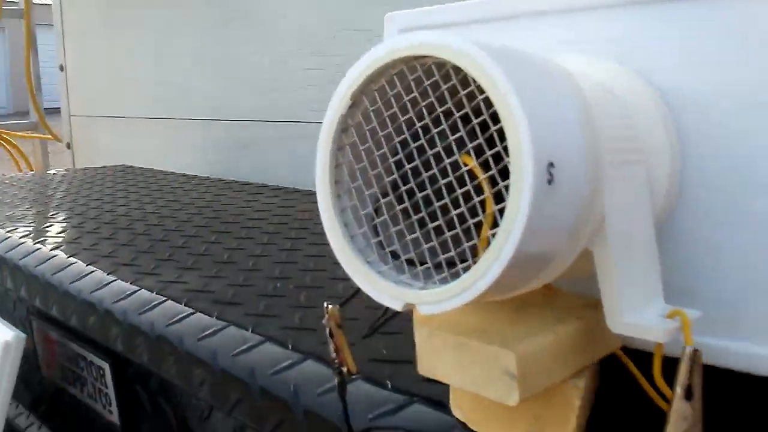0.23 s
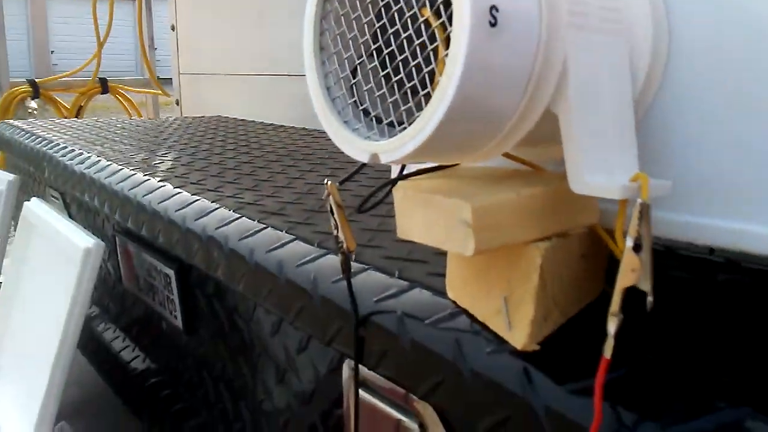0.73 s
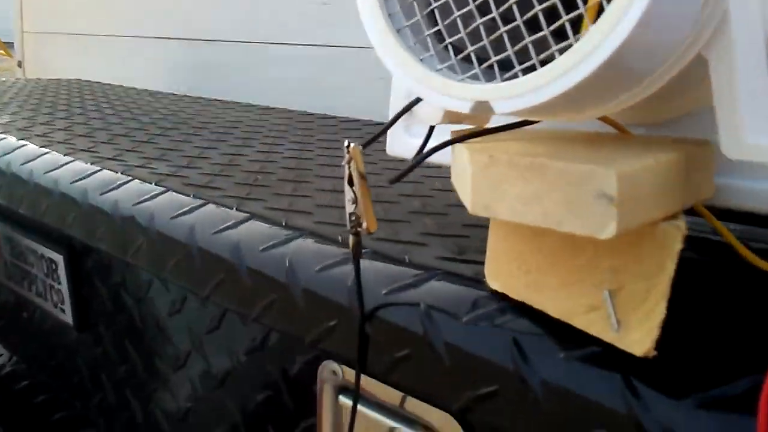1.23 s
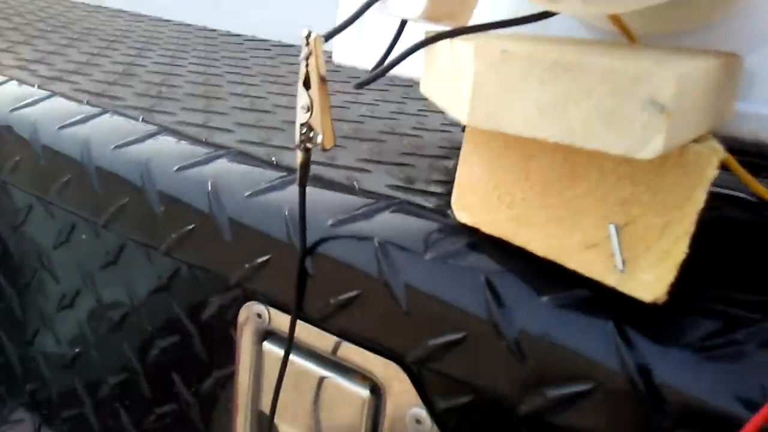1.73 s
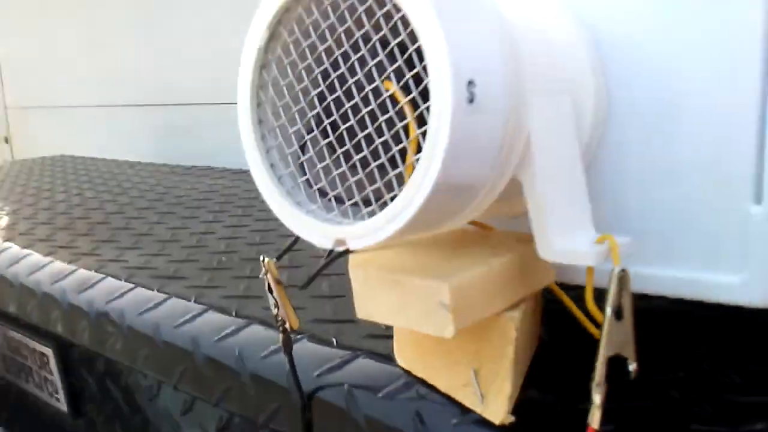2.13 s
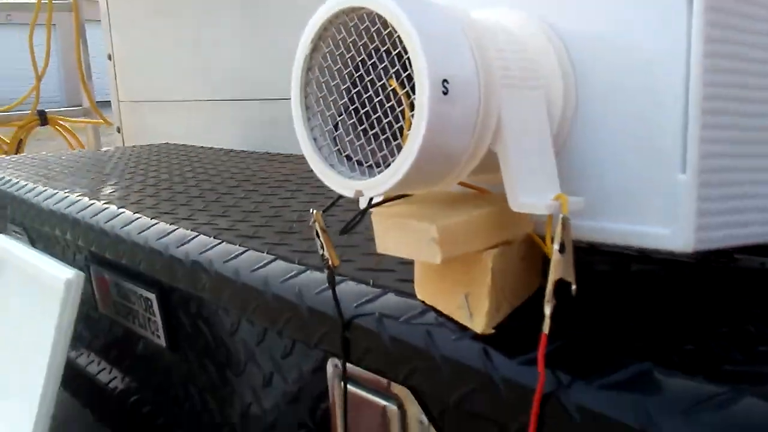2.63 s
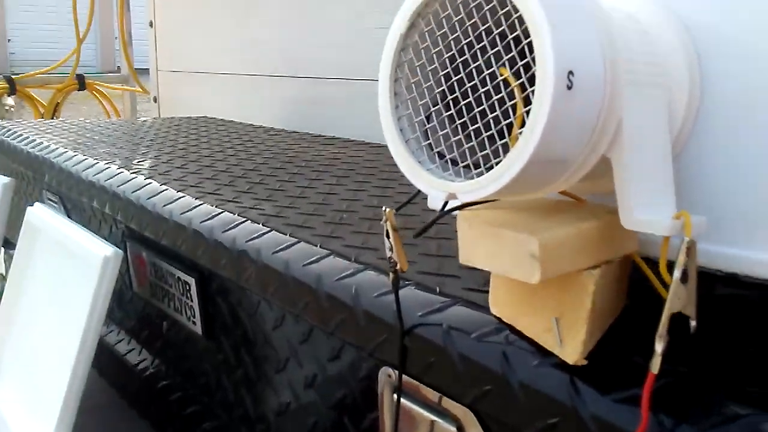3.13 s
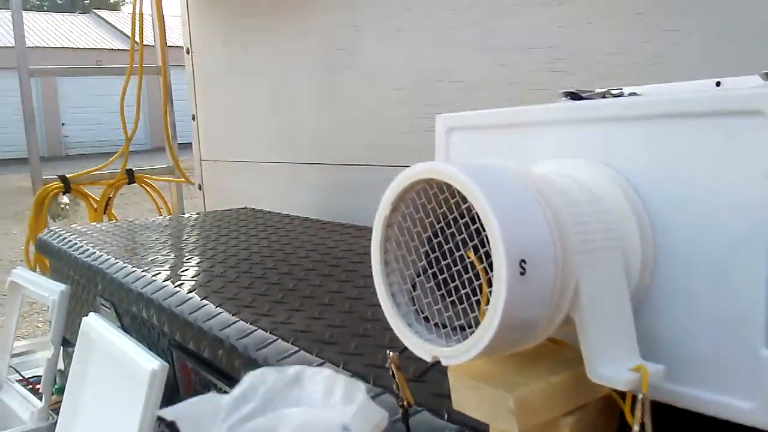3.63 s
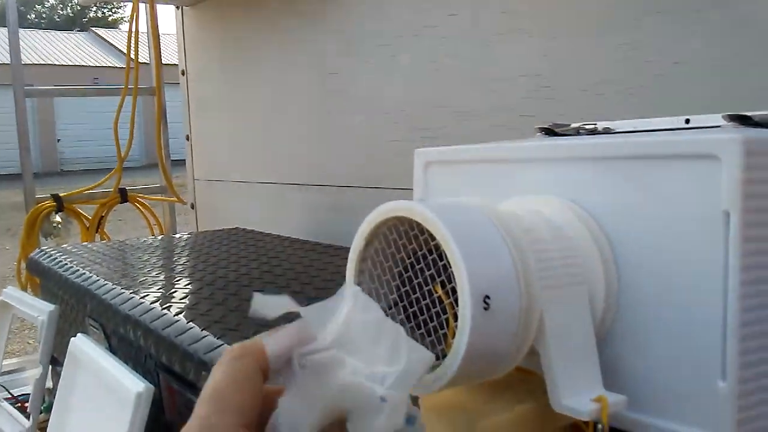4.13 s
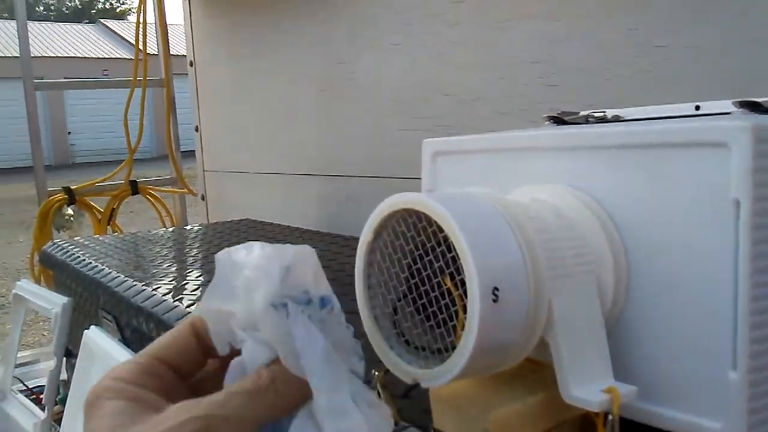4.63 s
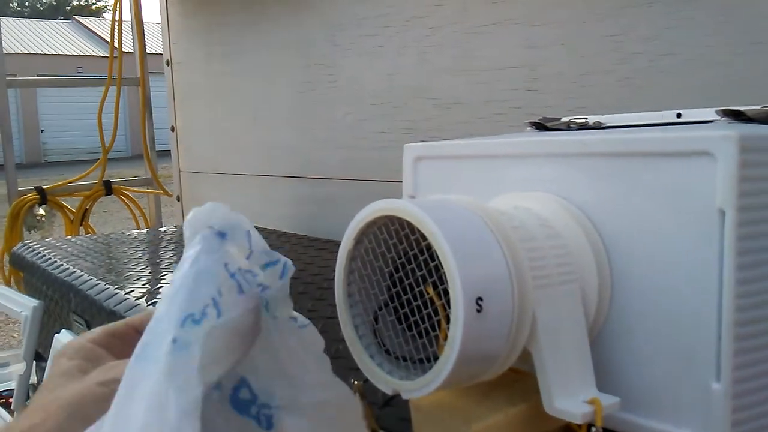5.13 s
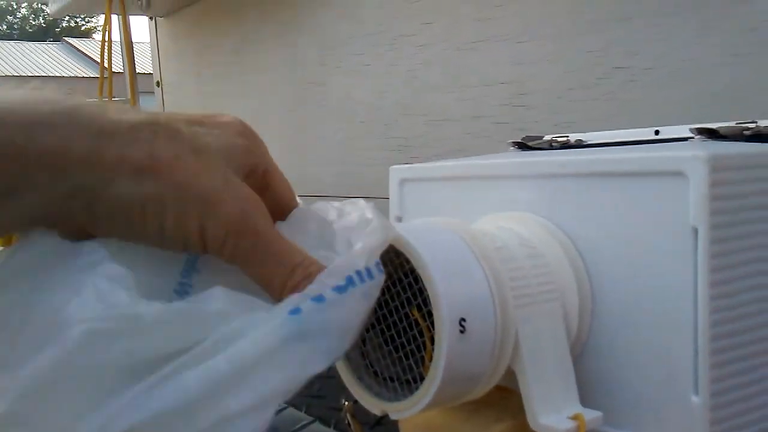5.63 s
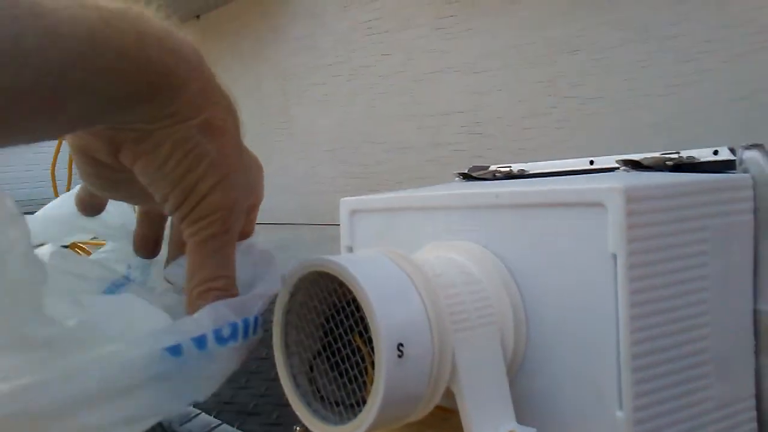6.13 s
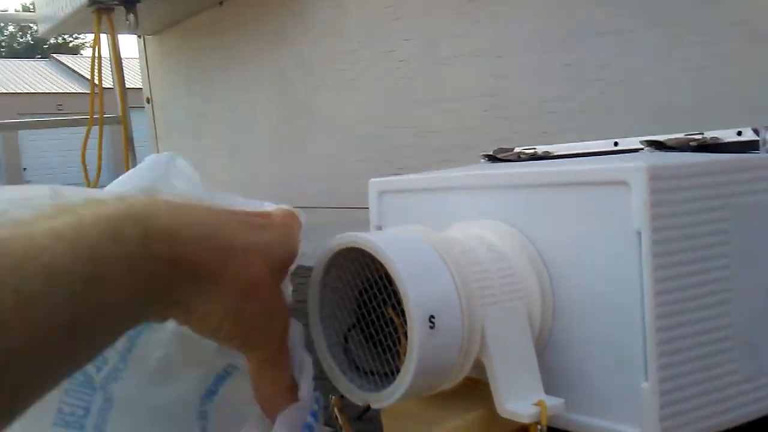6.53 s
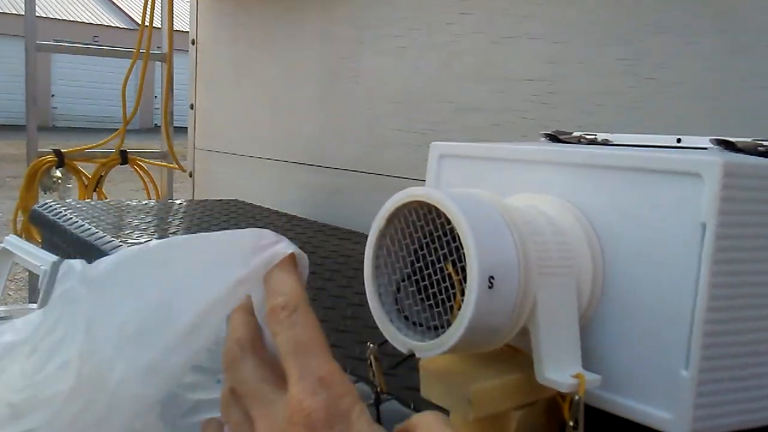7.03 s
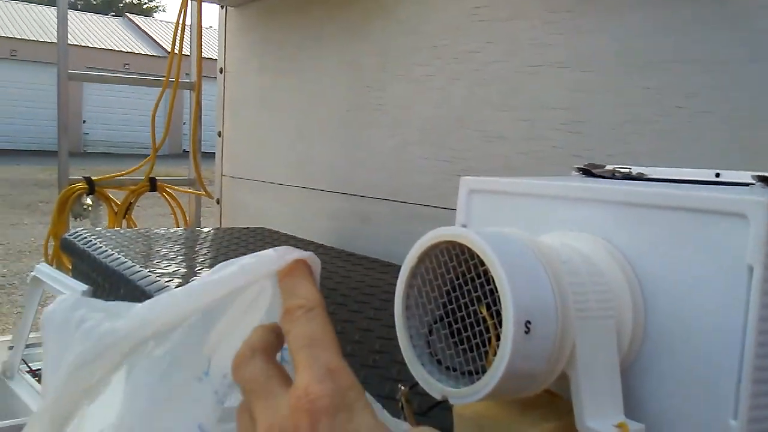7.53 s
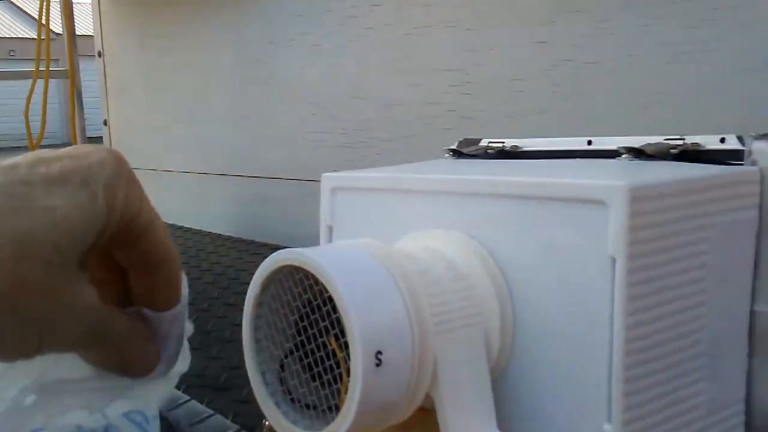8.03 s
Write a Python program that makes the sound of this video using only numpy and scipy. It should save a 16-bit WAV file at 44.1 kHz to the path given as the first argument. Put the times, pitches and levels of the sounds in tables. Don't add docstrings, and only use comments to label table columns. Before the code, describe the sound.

A small blower whines steadily around a high, piercing pitch with rushing ducted air while a thin plastic bag crackles in its stream outdoors.

```python
import sys
import numpy as np
from scipy import signal
from scipy.fft import rfft, irfft
from scipy.io import wavfile
from scipy.ndimage import uniform_filter1d

SR = 44100
rng = np.random.default_rng(int(sys.argv[2]) if len(sys.argv) > 2 else 0)


def transcribe(signal):
    frames = np.atleast_2d(signal).T
    limited = np.clip(frames, -1, 1)
    pcm = np.round(limited * 32767).astype(np.int16)
    wavfile.write(sys.argv[1], SR, pcm)


def gain_from_db(level_db):
    decades = np.asarray(level_db, float) / 20
    return 10 ** decades


N = 366030
TIME = np.arange(N) / SR
SLOW = TIME[::100]


def track(table):
    s, *columns = np.transpose(table)
    return [np.interp(TIME, s, c) for c in columns]


def shape(x, points, modes=()):
    hz = np.arange(1, N // 2 + 2) * SR / N
    point_hz, point_db = np.array(points).T
    gain = gain_from_db(np.interp(np.log(hz), np.log(point_hz), point_db))
    for centre_hz, width_hz, db in modes:
        gain = gain * np.sqrt(1 + gain_from_db(2 * db) / (1 + (2 * (hz - centre_hz) / width_hz) ** 2))
    return irfft(rfft(x) * gain, N)


def unit(x, lo_hz=20, hi_hz=20000):
    power = np.abs(rfft(x)[int(lo_hz * N / SR):int(hi_hz * N / SR)]) ** 2
    return x * N / np.sqrt(2 * power.sum())


def noise(points, modes=(), lo_hz=20, hi_hz=20000):
    return unit(shape(rng.standard_normal(N), points, modes), lo_hz, hi_hz)


def walk(rate_hz):
    k = int(SR / rate_hz)
    held = np.repeat(rng.standard_normal(N // k + 1), k)
    return 1.3 * uniform_filter1d(uniform_filter1d(held, k), k)[:N]


def tone(angle, db):
    return np.sqrt(2) * gain_from_db(db) * np.sin(angle + 2 * np.pi * rng.random())


def both(*dbs):
    return 10 * np.log10(sum(gain_from_db(db) ** 2 for db in dbs))


def bell(s, width_s, onset=1):
    side_s = np.where(SLOW < s, width_s * onset, width_s / onset)
    return np.exp(-((SLOW - s) / side_s) ** 2)


def swells(rows, rest_db, onset=1):
    power = gain_from_db(rest_db) ** 2 + sum(gain_from_db(db) ** 2 * bell(s, w, onset) for s, db, w in rows)
    return np.interp(TIME, SLOW, 10 * np.log10(power))


def dips(rows, which):
    depths = (depth * bell(s, w) for k, s, depth, w in rows if k == which)
    return np.interp(TIME, SLOW, sum(depths, 0 * SLOW))


def rotor_tones(angle, near, facing):
    # shaft_order, level_db, near_slope (dB per dB), facing_slope (dB per dB), wander_db
    tones = [(3, -37.5, 0, 0.1736, 0.86), (5, -37.5, 1, 0.095, 1.9), (6, -46.5, 0.2, 0, 2.5),
             (10, -36, -0.3, 0.1958, 1.73), (15, -23, 0, 0.11, 0.8), (20, -36, 0.5, 0.12, 2),
             (25, -45.5, 0.65, 0.5, 2.5), (40, -59, 0.5, 1.5, 0.5), (55, -54.5, 0.5, 1.02, 2.5)]
    # shaft_order, level_db, wander_db
    shaft = [(1, -59, 1.2), (2, -58, 2), (4, -56, 2), (9, -48, 2.5), (28, -46, 2), (30, -48, 2)]
    # shaft_order, centre_s, depth_db, width_s
    tone_nodes = [(15, 0.6, 5, 0.3), (15, 1.38, 7.5, 0.071), (15, 1.5, 4.5, 0.14), (15, 1.82, 7.5, 0.13),
                  (15, 1.25, -1, 0.063), (15, 6.68, 2.5, .08), (15, 6.95, -1.5, 0.18), (15, 2.695, 6, 0.2),
                  (15, 3.85, 6.5, 0.18), (15, 4.37, 4, 0.56), (15, 4.58, 9, 0.09), (15, 5.56, 4, 0.36),
                  (15, 5.96, 18, 0.26), (15, 6.43, 10, 0.25), (15, 7.92, 13, 0.086), (15, 7.3, 0.5, 0.2),
                  (15, 7, 0.5, 0.13), (15, 0.18, -2.5, 0.13), (15, 1, -2.5, 0.11), (15, 3.25, -1, 0.45),
                  (5, 1.41, 8.5, 0.12), (5, 2.33, 3.5, 0.26), (5, 2.9, 7, 0.2), (5, 6.2, 3, 0.17),
                  (5, 7.73, 10.5, 0.085), (5, 2, -2.5, 0.18), (5, 0.32, -1, 0.31), (5, 3.8, -2, 0.46),
                  (5, 8, -4.5, 0.07), (5, 6.9, 4, 0.052), (5, 4.7, 3.5, 0.036), (5, 5.9, 9, 0.024),
                  (5, 4.6, 1, 0.034), (5, 6.85, -3, .1), (5, 6.6, 3, 0.16), (5, 6.1, -2.5, 0.042),
                  (10, 0.092, 12, 0.1), (10, 2.84, 4.5, 0.32), (10, 3.6, 16, 0.057), (10, 7.25, 3, 0.59),
                 (10, 0.6, -4, 0.1), (10, 1.5, 3, 0.35), (10, 2.1, -1, 0.12), (10, 5.28, 3, 0.19),
                 (10, 4.62, -3, 0.14), (10, 5.9, -2.5, 0.31), (6, 0.16, 11, 0.24), (6, 7.6, 5, 0.82),
                 (6, 3.2, -2, .3), (6, 5.9, -3, 0.36), (6, 2.7, 2, .2), (6, 1.59, -3, .3),
                 (6, 4.7, -4.5, .3), (3, 1.25, -2, 0.093), (3, 1.8, -2.5, 0.16), (3, 8.4, 3, .3),
                 (5, 3.2, 3, .2), (5, 1, 3, .15), (3, .05, 3, .15), (3, 5.5, 2, 0.23),
                  (20, 0.64, 13, 0.31), (20, 2.55, 14, 0.34), (20, 7.1, -1.5, 0.33), (20, 7.7, -3, 0.31),
                  (20, 3.2, 4, 0.22), (20, 5.2, 5, 0.22), (40, 0.37, 8, .4), (40, 7.2, -8, .25),
                  (40, 3.7, 2, 2), (40, .9, 5, .3), (40, 2.2, 5, 0.23), (55, 6.7, 3, .15), (55, 4.5, 2, .2),
                  (55, 2.2, 6.5, .08), (55, 3.3, -5, .25), (55, 3.6, 3, .2), (55, 5.09, 11, .35),
                  (55, 5.65, -2, .1), (55, 6.3, 12, 0.31), (55, 7.2, -4.5, .25), (55, 7.7, 3, .2),
                  (55, 0.26, -3, .2), (55, 0.78, 1, 0.17), (25, 5.5, -10, .12), (25, 1.6, -1, .3)]
    nodes = tone_nodes
    out = np.zeros(N)
    for order, db, by_near, by_facing, wander_db in tones:
        level_db = db + by_near * near + by_facing * facing - dips(nodes, order)
        out += tone(order * angle, level_db + wander_db * walk(18))
    for order, db, wander_db in shaft:
        out += tone(order * angle, db + wander_db * walk(4.017))
    return out


def beamed_tones(angle, hiss_db, front_db):
    # shaft_order, level_db (re hiss)
    beamed = [(35, -14), (36, -16), (50, -25), (51, -24), (53, -28), (52, -28), (54, -27), (58, -25),
              (56, -26), (57, -27), (61, -23), (70, -24.5)]
    beam_db = hiss_db + 0.22 * (front_db + 32)
    return sum(tone(order * angle, beam_db + db + 3 * walk(3.7)) for order, db in beamed)


def jet_hiss_db(facing, rustle_db):
    # centre_s, depth_db, width_s
    shades = [(2.93, 4, 0.088), (3.55, 6, 0.056), (3.68, 2, .04), (2.54, 2, .05), (6.95, 5, .04),
              (7.62, 3, .05), (2.4, 0.5, 0.13), (0.073, 0.5, .15), (4.9, 4, .03), (8.2, -1, .04),
              (3.8, 3, .04), (4.3, 5, 0.042), (4.6, 1, 0.045), (5.76, 6, 0.038), (6.6, 7, 0.07),
              (6.4, 3, .12), (6.54, 9, 0.04), (6.69, 4, .03), (7.87, 0, .05)]
    on_axis_db = -45 + np.minimum(facing, 14)
    shade_db = sum(depth * bell(s, w) for s, depth, w in shades)
    return both(on_axis_db, rustle_db + 5.5) - np.interp(TIME, SLOW, shade_db)


def duct_air(rush_db, ring_db, grille_db, hiss_db, sheen_db, beam_db):
    # centre_hz, width_hz, level_db (over the rush)
    duct = [(1104.5, 72, 11.5), (2170, 46, 5), (2243, 136, 5), (2803, 61, 4.5), (3554, 31, 1.5)]
    # pitch_hz, level_db
    rush = [(150, -25), (250, -11), (400, -1), (800, -0.5), (1300, 0), (1700, -1), (2000, -9), (2600, -32)]
    # pitch_hz, level_db
    ring = [(1500, -8.5), (1800, -4.5), (2050, -0.5), (2500, -1), (3000, -2), (3400, -5), (3900, -41)]
    # pitch_hz, level_db
    grille = [(2400, -28), (2900, -4.5), (3300, -3), (3900, 1.5), (4300, 3.5), (4700, -10.5)]
    # pitch_hz, level_db
    hiss = [(4600, -8), (6050, -3.5), (6450, -1.5), (7500, -2.5), (8100, -3.5), (9300, -12.5), (11400, -27),
            (15500, -34)]
    # pitch_hz, level_db
    sheen = [(5900, -25), (6450, -5), (6900, -9), (7400, -14), (8100, 0), (9000, -1), (10000, -21)]
    # pitch_hz, level_db
    beam = [(3000, -25), (3400, -12), (3600, -1), (4000, -2), (4300, 2), (4700, -16)]
    # colour, level_db, band of that level lo_hz and hi_hz, flicker_db
    layers = ((rush, rush_db, 800, 1250, 0.6), (ring, ring_db, 2000, 2500, 0.7),
              (grille, grille_db, 3250, 4050, 0.8), (hiss, hiss_db, 5800, 9500, 0.8),
              (sheen, sheen_db, 7200, 9500, 0.8), (beam, beam_db, 3250, 4050, 1.2))
    air = np.zeros(N)
    for colour, db, lo_hz, hi_hz, flicker_db in layers:
        closed = [(colour[0][0] / 2, -80)] + list(colour) + [(colour[-1][0] * 2, -80)]
        air += noise(closed, duct, lo_hz, hi_hz) * gain_from_db(db + flicker_db * walk(16))
    return air


def whine_skirt():
    # pitch_hz, level_db
    skirt = [(1500, -33), (1700, -4), (1850, -1), (2000, 4), (2080, -15), (2200, -42)]
    # centre_s, peak_db, width_s
    skirt_swells = [(.15, -33, 0.18), (1.98, -33, 0.12), (2.4, -38, .15), (3.3, -38, .3), (5, -33.5, 0.22),
                    (6.65, -34, 0.13), (7.2, -38.5, 0.27)]
    return noise(skirt) * gain_from_db(swells(skirt_swells, -48))


def blower(rustle_db):
    # time_s, whine_hz (at the 15th shaft order)
    speed = [(0, 1919), (.4, 1915), (.9, 1918), (1.9, 1917), (2.35, 1910), (2.9, 1913.5), (3.7, 1911.5),
             (4.1, 1914), (4.62, 1920), (5.0, 1910), (5.6, 1911.5), (6.3, 1914), (6.75, 1918.5),
             (7.2, 1913), (7.9, 1909.5), (8.3, 1913)]
    # time_s, near_db (gain from nearness), facing_db (treble beam from facing the mouth)
    pose = [(.1, 2, 12.5), (.75, -1, 10), (1.35, 3.5, 14.5), (1.62, 4, 16.5), (2.03, 3, 13.5), (2.5, -1, 5),
            (2.93, -0.5, 3), (3.56, 0, 2), (4.37, 0, 0), (5.2, 0.5, 1.5), (5.7, -0.5, 1), (6.15, 0.5, -4.5),
            (6.3, -0.5, -1), (6.9, -0.5, -3.5), (7.05, -1, 2), (7.4, -2, 1.5), (7.63, 0.5, -2),
            (8.3, 2.5, -4.5)]
    # layer (1 rush, 2 ring, 3 grille), centre_s, depth_db, width_s
    lobes = [(1, 0.79, -1, 0.41), (1, 2.36, 1.2, 0.35), (1, 7.17, 2.5, 0.39), (1, 7.95, -0.2, 0.13),
             (1, 4.9, 0.35, 0.27), (2, 0.85, 0.83, .2), (2, 1.9, -0.8, 0.43), (2, 2.2, 1, 0.27),
             (2, 3.83, -0.1, 0.16), (2, 6.1, 2, 0.2), (2, 7.3, -1.3, 0.19), (2, 8, 2.4, 0.14),
             (2, 8.2, 0.23, 0.27), (1, 6, 0.71, 0.23), (3, 3, -2, 0.24), (3, 7.3, 1.5, 0.48),
             (3, 8.15, -2, 0.13), (3, 2.33, 0, .15), (3, 0.31, 2.5, 0.12), (3, 1.2, 3, 0.17)]
    shaft_hz = track(speed)[0] / 15
    near, facing = track(pose)
    angle = 2 * np.pi * np.cumsum(shaft_hz + 0.048 * walk(12)) / SR

    rush_db = -33.5 + 0.49 * near + 0.13 * facing - dips(lobes, 1)
    ring_db = -28 + near - dips(lobes, 2)
    grille_db = both(-30 + 0.19 * near + 0.1 * facing, rustle_db + 12) - dips(lobes, 3)
    hiss_db = jet_hiss_db(facing, rustle_db)
    off_beam_db = facing - 16
    sheen_db = -33.5 + 2.3 * off_beam_db
    beam_db = -21.5 + 2.73 * off_beam_db

    tones = rotor_tones(angle, near, facing) + beamed_tones(angle, hiss_db, both(grille_db, beam_db))
    air = duct_air(rush_db, ring_db, grille_db, hiss_db, sheen_db, beam_db) + whine_skirt()
    throb = 1 + 0.046 * np.sin(angle)
    return tones + air * throb


def rustling():
    # centre_s, dull_db, width_s, bright_db (above the dull)
    rustles = [(1.55, -62, .12, -1), (1.8, -50, 0.13, -2), (2.05, -48, 0.059, -4.5),
               (2.29, -47, 0.082, -2.5), (2.62, -46, 0.088, -7), (2.82, -49, 0.047, -7),
               (3.06, -50, 0.14, -4), (3.38, -50.5, 0.084, -7), (3.79, -58, 0.04, 4), (3.96, -54, 0.059, 4),
               (4.15, -61, 0.12, 4), (4.42, -74, 0.065, 4), (4.69, -55, 0.052, 1), (5.0, -59, 0.19, 4),
               (5.22, -54.5, .08, 6), (5.45, -54, 0.091, 4), (5.8, -57, 0.12, 5), (6.05, -71, .15, 10),
               (6.5, -62.5, .1, 11), (6.72, -64, 0.11, 5), (7.1, -74, .2, 4), (7.4, -56, 0.046, -2),
               (7.81, -60, 0.045, 9), (8.0, -54, 0.067, 1), (8.12, -54, 0.086, 2), (8.24, -43.5, .05, -3),
               (.1, -59, .3, -3), (3.6, -64, .1, 0), (6.28, -68, .1, 6), (6.93, -69, .1, 5),
               (7.3, -68, .1, 3), (7.48, -66, .04, 3), (5.62, -64, .08, 3)]
    # dull_db, bright_db
    idle_db = (-72, -69)
    levels = []
    for bright, rest_db in enumerate(idle_db):
        rows = [(s, db + bright * up, w) for s, db, w, up in rustles]
        flutter_db = 1.5 * walk(30)
        levels.append(swells(rows, rest_db, onset=0.77) + flutter_db)
    return levels


def bag(dull_db, bright_db):
    # pitch_hz, level_db
    fold_colour = [(3000, -14), (6000, 0.5), (8000, 8), (10000, 0.5), (12500, -3.5), (13500, -10),
                   (15000, -30)]
    # pitch_hz, level_db
    film_colour = [(9000, -30), (12000, -16), (13300, -5), (14500, -1), (15700, -1)]
    # start_s, peak_db, dull_db (dull part re peak)
    snap_events = [(2.2257, -36, -10), (3.2893, -41, 1), (3.7382, -41, -11), (3.7632, -36, -12),
                   (3.7866, -42, -11), (3.8126, -37, -14), (3.8515, -39, -16.5), (3.8694, -43, -14),
                   (3.8929, -41, -17), (3.9114, -36, -17), (3.9305, -29, -11), (3.9503, -30, -14),
                   (3.9922, -34, -16), (3.9665, -35, -16), (4.0286, -36, -16), (4.04, -38, -19),
                   (4.054, -37, -18), (4.0805, -34, -20), (4.32, -43, -18), (4.5534, -41, -16),
                   (4.6582, -41, -12), (4.6996, -40, -10), (5.0168, -38, -16), (5.1086, -39, -10),
                   (5.174, -43.5, -15), (5.2733, -36, -16), (5.6304, -42, -14), (5.809, -38, -11),
                   (6.8511, -42, -15), (6.8831, -44, -13), (7.381, -35, -10), (7.7746, -37.5, -11),
                   (7.8329, -38, -21), (8.233, -33, -2)]
    creases = (rng.random(N) < 2500 / SR) * gain_from_db(3.4 * rng.exponential(size=N).clip(0, 4))
    tail = np.exp(-np.abs(np.arange(-450, 450)) / (0.003 * SR))
    bed = np.sqrt(signal.fftconvolve(creases ** 2, tail ** 2)[:N].clip(0))
    bed = bed / np.sqrt(np.mean(bed ** 2))

    snap_s = 0.0019
    snaps = np.zeros((2, N))
    for s, db, dull in snap_events:
        snaps[:, int(s * SR)] = gain_from_db(db + dull - 9), gain_from_db(db - 11)
    pulse = np.exp(-((TIME[:900] - 1.5 * snap_s) / (1.3 * snap_s)) ** 2)
    snaps = signal.fftconvolve(snaps, pulse[None])[:, :N]

    folds = noise([(1000, -47)] + fold_colour, lo_hz=10900, hi_hz=13100)
    film = noise(film_colour, lo_hz=13400, hi_hz=16400)
    dull = folds * (bed * gain_from_db(dull_db - 2.0) + snaps[0])
    bright = film * (bed * gain_from_db(bright_db + 1.5) + snaps[1])
    return dull + bright


def buffets():
    # peak_s, peak_db, pitch_hz
    puffs = [(4.735, -34, 190), (4.745, -21, 220), (4.755, -39, 190), (4.771, -27, 270), (4.788, -27, 221),
             (4.804, -20.5, 260), (4.827, -27, 240), (4.897, -32, 230), (4.971, -34, 190),
             (4.986, -29, 190), (5.004, -28, 250), (5.198, -31, 230), (5.217, -28, 280), (5.313, -23, 282),
             (5.351, -21, 220), (5.359, -23, 420), (5.365, -24, 200), (5.38, -21, 290), (5.392, -19, 294),
             (5.404, -24, 238), (5.422, -23, 262), (5.432, -31, 330), (5.396, -28, 420), (4.876, -33, 220),
             (5.56, -34, 200), (5.444, -35, 240), (5.487, -32, 150), (5.503, -32, 170), (5.53, -34, 198),
             (5.541, -25, 220), (6.571, -29, 208), (6.969, -43, 70), (7.8, -44.5, 70), (4.749, -33, 75),
             (4.806, -39, 75), (5.37, -39, 75), (5.49, -35, 75), (5.556, -36, 75), (.17, -47, 70),
             (.78, -45, 70), (6.58, -47, 70), (0.007, -30, 240), (0.087, -30.5, 250)]
    turns, body_s = 0.794, 0.0065
    out = np.zeros(N)
    t = np.arange(3600) / SR
    gust = noise([(30, -32), (60, -21), (150, -1), (380, 4), (560, -12), (900, -50)])
    for s, db, hz in puffs:
        peak_s = 3 * turns / hz
        i = max(int((s - peak_s) * SR), 0)
        thump = np.exp(-(t * hz / turns - 3) ** 2) * np.sin(2 * np.pi * (hz * t + rng.random()))
        body = np.exp(-((t - peak_s) / body_s) ** 2) * gust[i:i + len(t)]
        out[i:i + len(t)] += gain_from_db(db + 1.5) * thump + gain_from_db(db - 17.5) * body
    return out


def far_engine():
    # time_s, pitch_hz
    firing = [
        (0, 207),
        (.3, 213),
        (.9, 210),
        (2.1, 210),
        (3, 215.5),
        (6.2, 215.6),
        (6.66, 211),
        (7.2, 200),
        (8.3, 208),
    ]
    # centre_s, peak_db, width_s
    wind_swells = [(0, -43, 0.066), (.55, -46.5, 0.29), (1.36, -41, 0.18), (1.9, -40, 0.16),
                   (2.58, -39.5, 0.18), (3.18, -36, 0.14), (3.88, -40.5, 0.19), (4.56, -42, 0.081),
                   (4.76, -39, 0.045), (5.1, -40.5, 0.12), (5.4, -38, 0.11), (5.78, -38.5, 0.15),
                   (6.1, -46, 0.19), (6.62, -41.5, .2), (7.42, -39.5, .13), (8.12, -40.5, 0.15)]
    # time_s, level_db
    half_order = [(0, -57.5), (.4, -62), (1.3, -66), (1.9, -57), (2.4, -62), (2.9, -52), (3.4, -59.5),
                  (3.9, -52), (4.6, -55), (5, -63), (6, -63), (7, -68), (8.3, -64)]
    angle = 2 * np.pi * np.cumsum(track(firing)[0] + 0.79 * walk(11)) / SR
    note = tone(angle, swells(wind_swells, -54.5) - 0.5)
    return note + tone(angle / 2, track(half_order)[0] + 1.5 * walk(2.86))


def yard():
    # time_s, level_db
    traffic = [(0, -59), (.16, -52), (.62, -68), (.78, -55), (.9, -61), (2.4, -71), (3.37, -63),
               (3.51, -50.5), (4.6, -55), (4.74, -47), (5.15, -44.5), (5.55, -39), (5.66, -52), (6, -48),
               (6.9, -55), (7, -51.5), (7.47, -60), (7.75, -50.5)]
    # time_s, pitch_hz
    drone_pitch = [(0, 60), (3.4, 62), (4.2, 61), (4.7, 65), (5.5, 72), (6.4, 78), (7.0, 81), (7.8, 84),
                   (8.3, 76)]
    # pitch_hz, level_db
    rumble_colour = [(25, -44), (65, -5), (100, -15), (140, -7), (180, 1), (250, 5.5), (330, -3),
                     (450, -30)]
    db, hz = track(traffic)[0], track(drone_pitch)[0]
    drone = tone(2 * np.pi * np.cumsum(hz + 2.23 * walk(12)) / SR, db - 3.5 + 1.8 * walk(15))
    tyres = noise([(20, -50), (40, -15), (60, 10), (90, 4), (115, -30), (200, -60)]) * gain_from_db(db - 8.5)
    rumble_db = -46.5 + 0.26 * (db + 56.0) + 0.94 * walk(3.14)
    rumble = noise(rumble_colour) * gain_from_db(rumble_db)
    breeze = noise([(15, -20), (30, 0), (45, 0), (70, -30)]) * gain_from_db(-79 + 3 * walk(5.5))
    return drone + tyres + rumble + breeze


def scene():
    dull_db, bright_db = rustling()
    near_sounds = blower(dull_db) + bag(dull_db, bright_db) + buffets()
    return (near_sounds + far_engine() + yard())[None]


def roll_off(x):
    return signal.sosfilt(signal.butter(12, 15720, fs=SR, output="sos"), x)


def record(dry):
    # pitch_hz, level_db
    mic = [(3980, 0), (4120, -11.5), (4250, -25), (4340, -32), (4550, -30.5), (5100, -14), (5600, -8.5),
           (6100, -1)]
    # pitch_hz, level_db
    hum_notch = [(22, -14), (45, 0), (108, 0), (118, -20), (126, 0)]
    heard = shape(dry[0], mic)
    mix = shape(heard, hum_notch)[None]
    return roll_off(mix)


dry = scene()
out = record(dry)
transcribe(out)
```